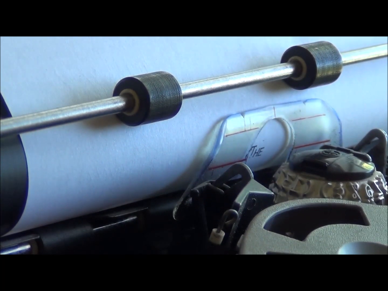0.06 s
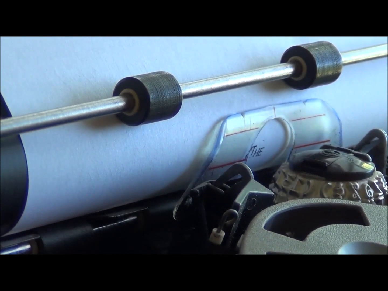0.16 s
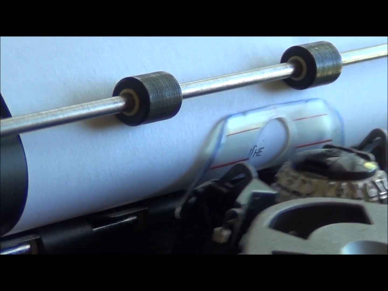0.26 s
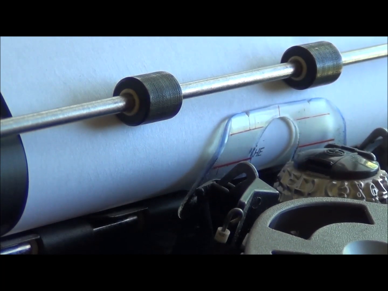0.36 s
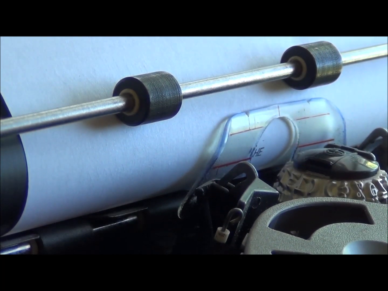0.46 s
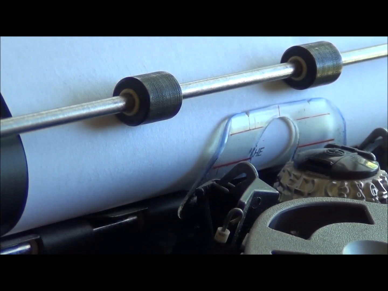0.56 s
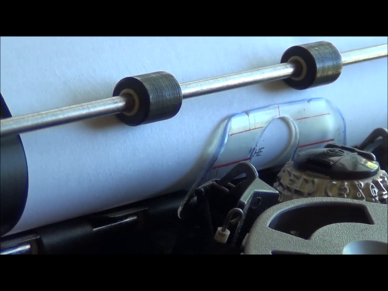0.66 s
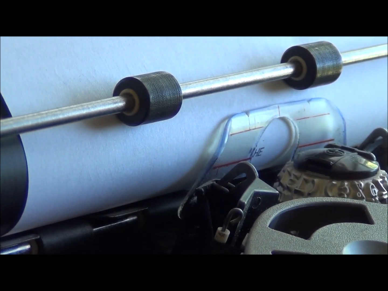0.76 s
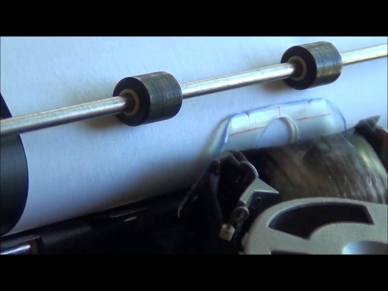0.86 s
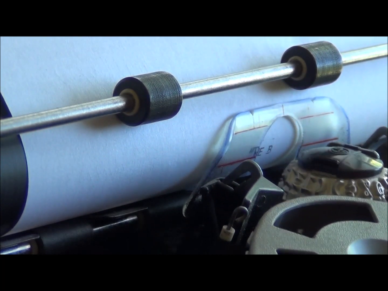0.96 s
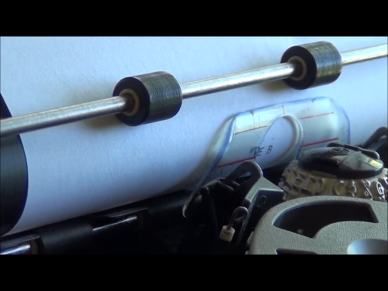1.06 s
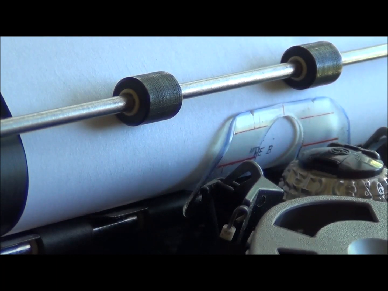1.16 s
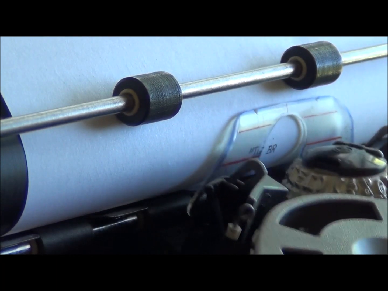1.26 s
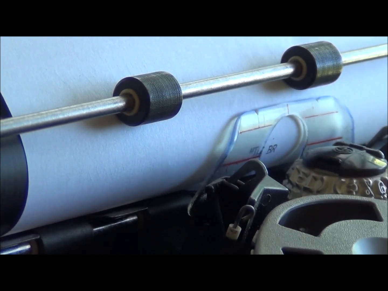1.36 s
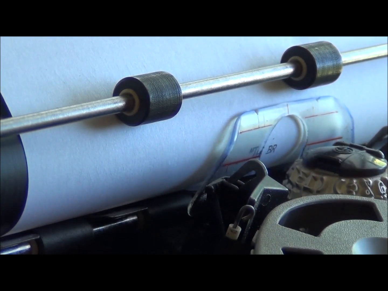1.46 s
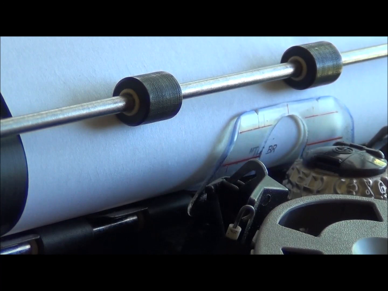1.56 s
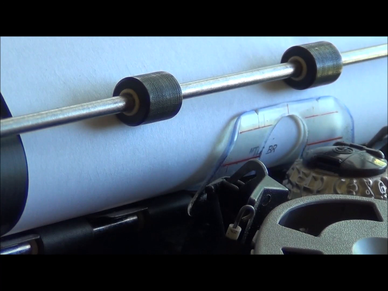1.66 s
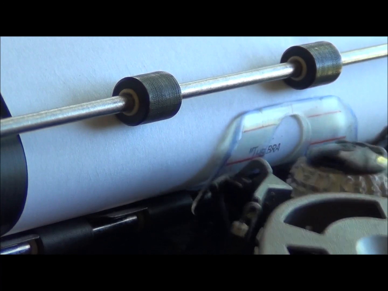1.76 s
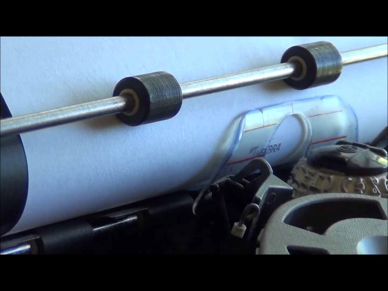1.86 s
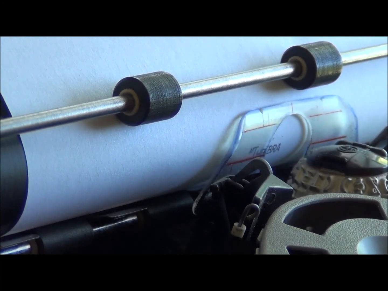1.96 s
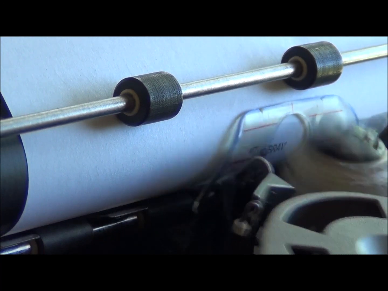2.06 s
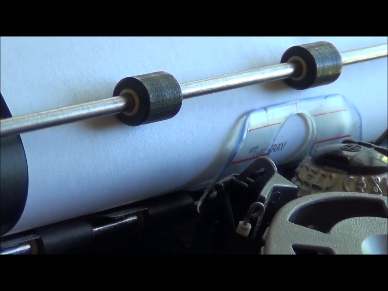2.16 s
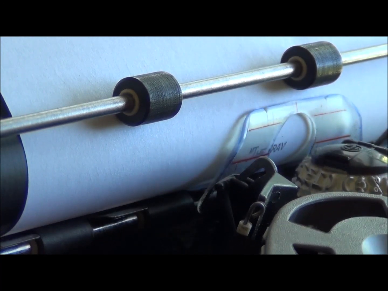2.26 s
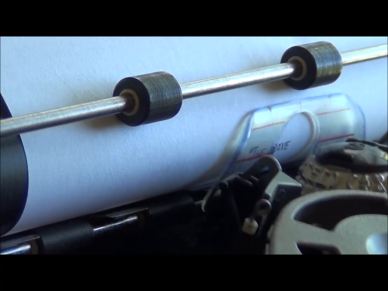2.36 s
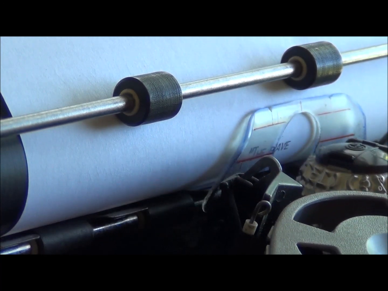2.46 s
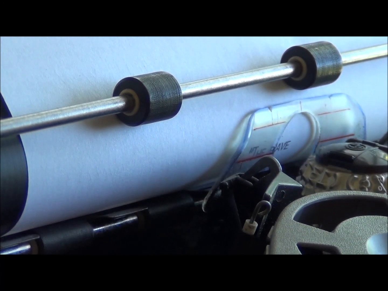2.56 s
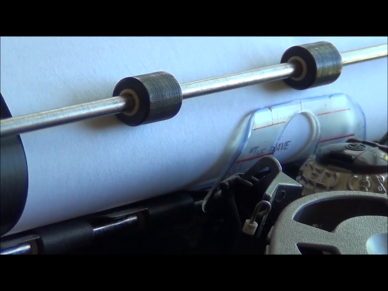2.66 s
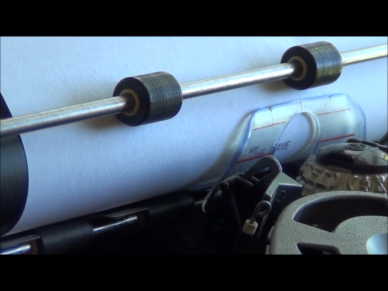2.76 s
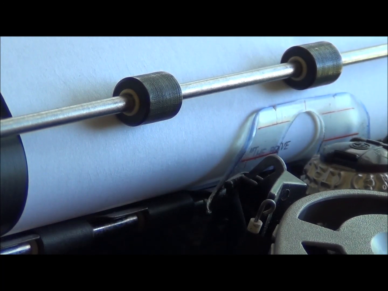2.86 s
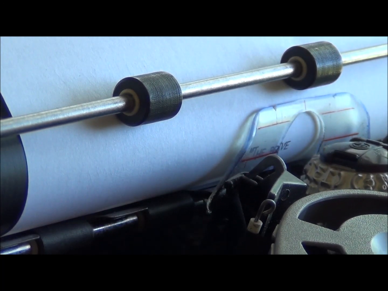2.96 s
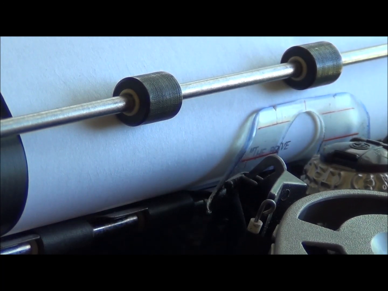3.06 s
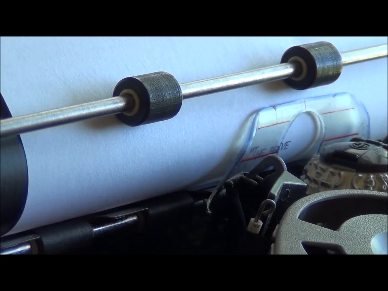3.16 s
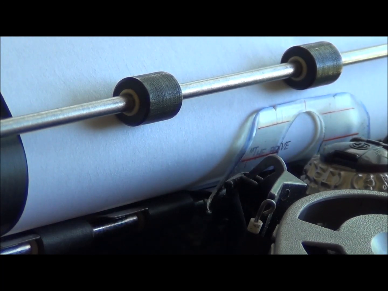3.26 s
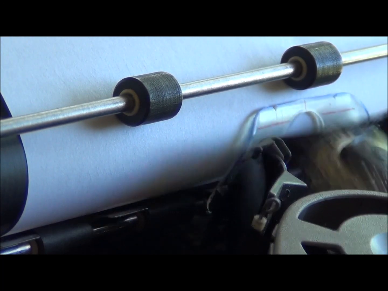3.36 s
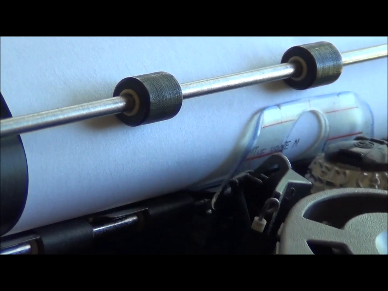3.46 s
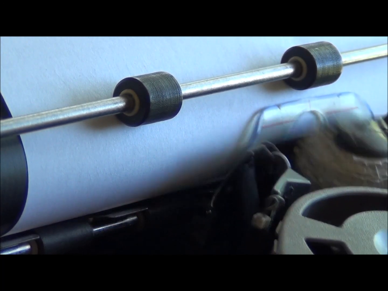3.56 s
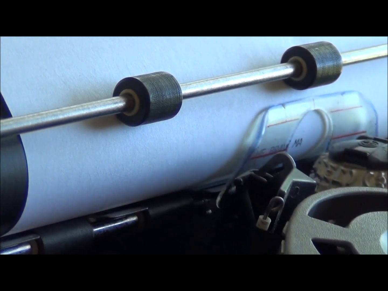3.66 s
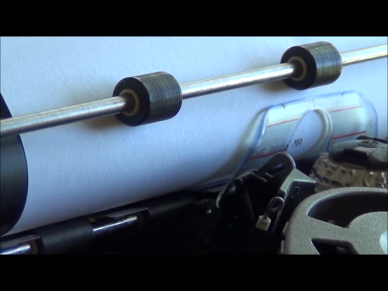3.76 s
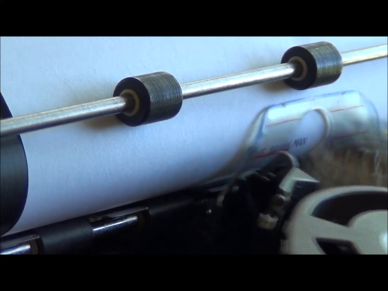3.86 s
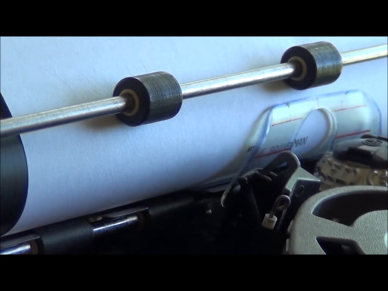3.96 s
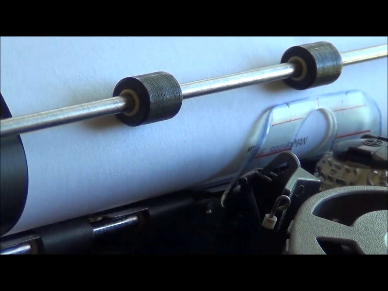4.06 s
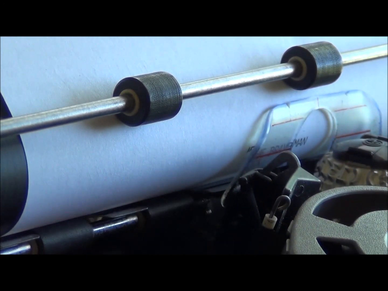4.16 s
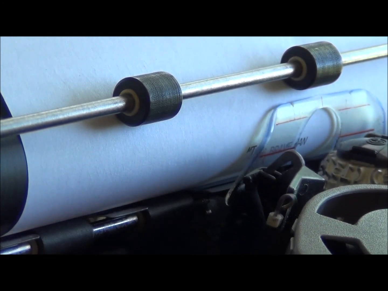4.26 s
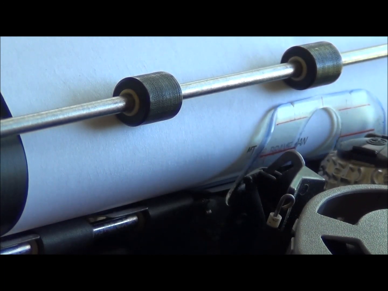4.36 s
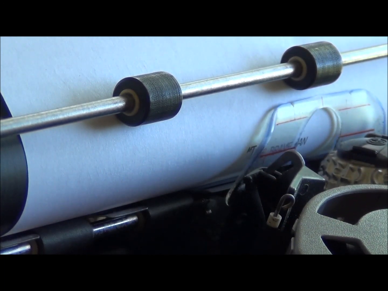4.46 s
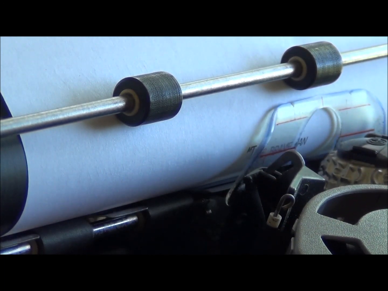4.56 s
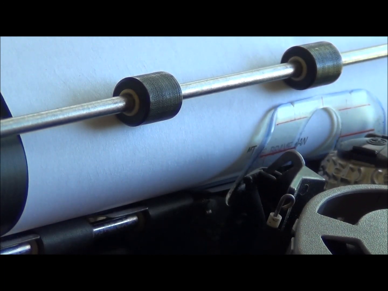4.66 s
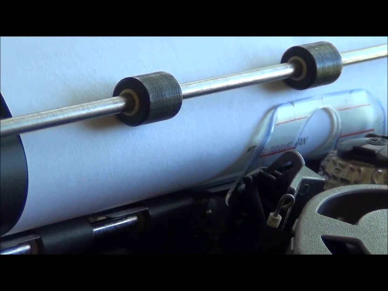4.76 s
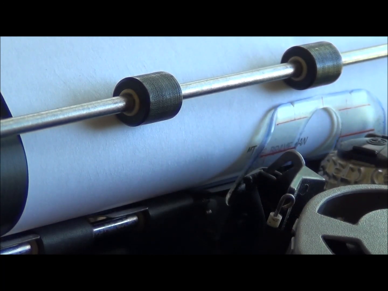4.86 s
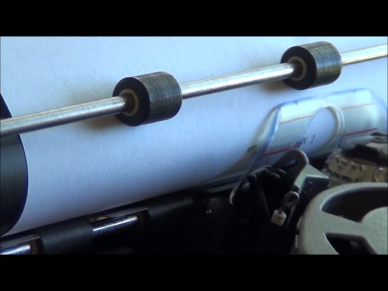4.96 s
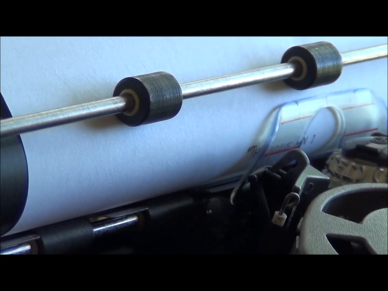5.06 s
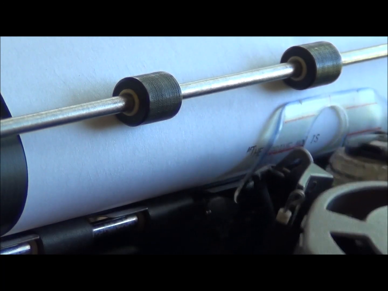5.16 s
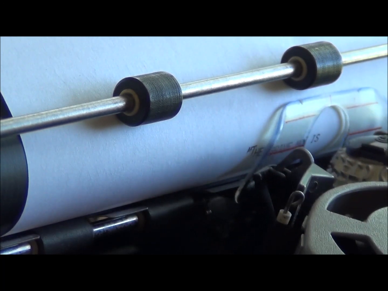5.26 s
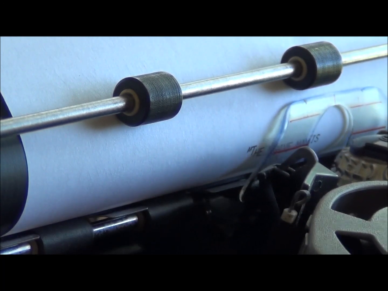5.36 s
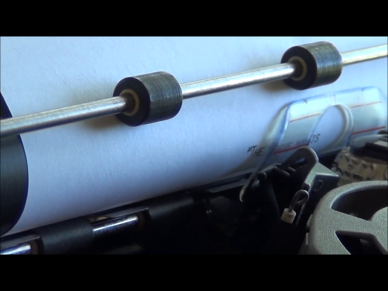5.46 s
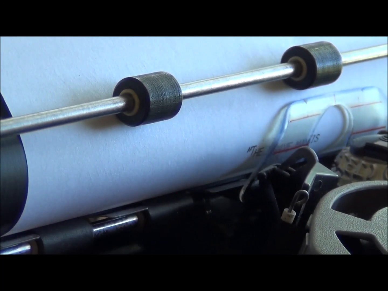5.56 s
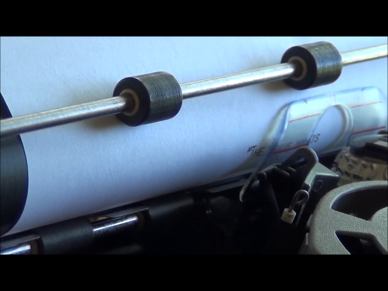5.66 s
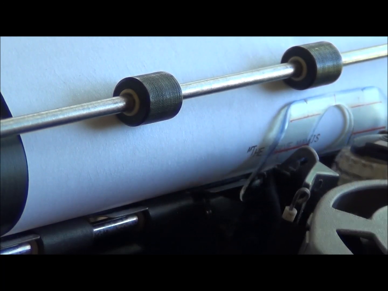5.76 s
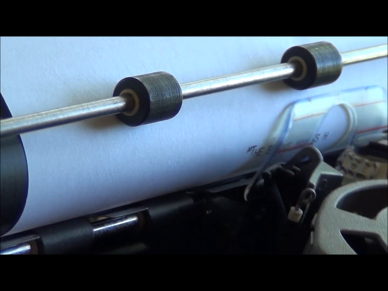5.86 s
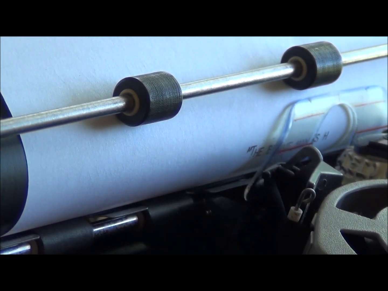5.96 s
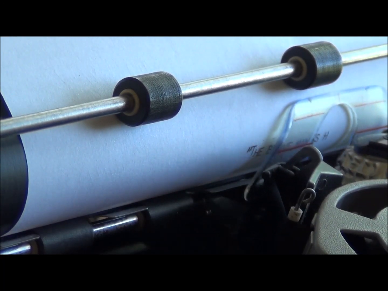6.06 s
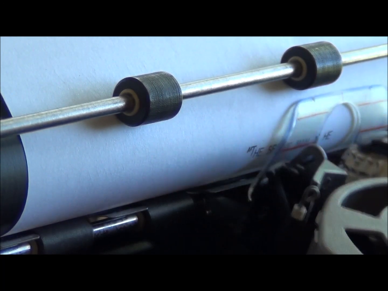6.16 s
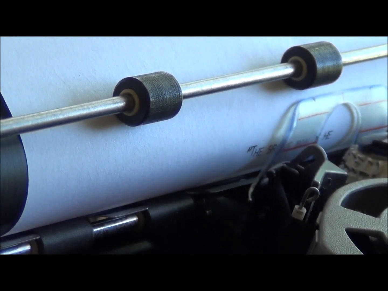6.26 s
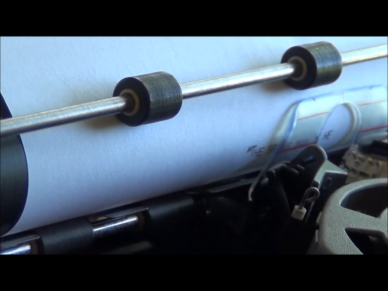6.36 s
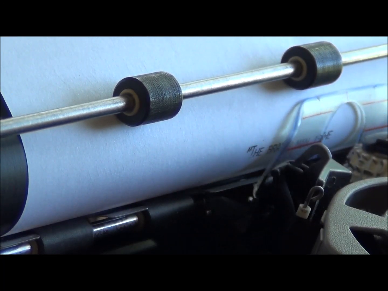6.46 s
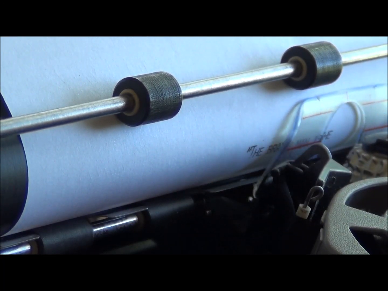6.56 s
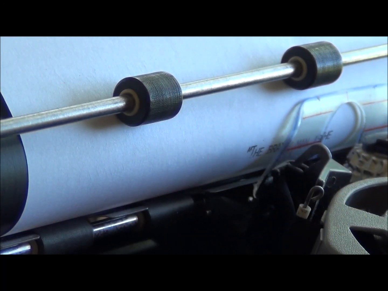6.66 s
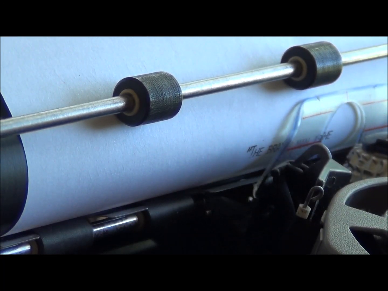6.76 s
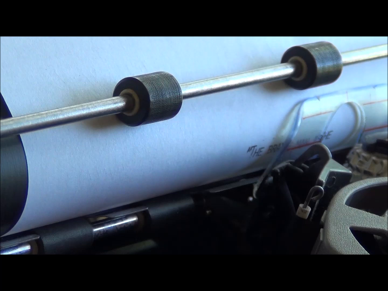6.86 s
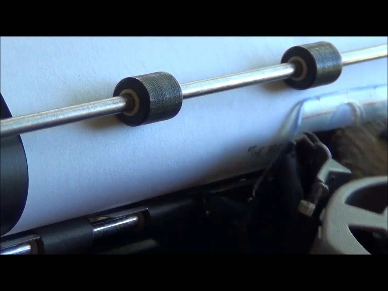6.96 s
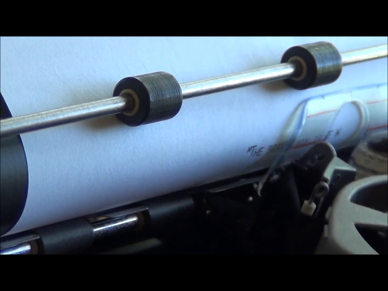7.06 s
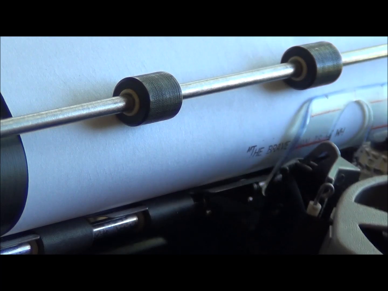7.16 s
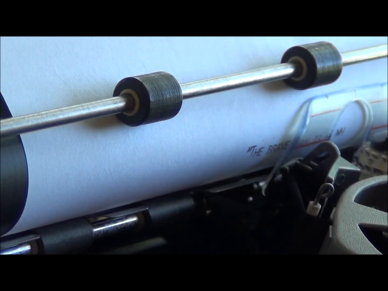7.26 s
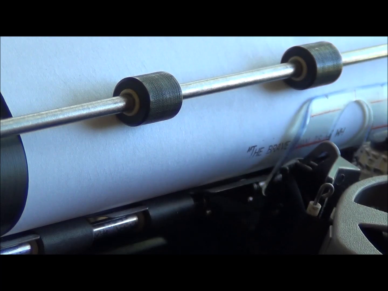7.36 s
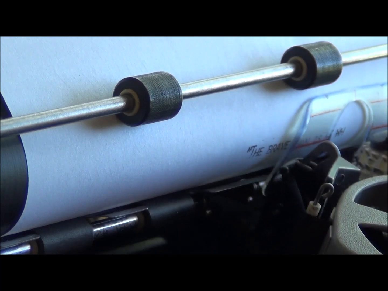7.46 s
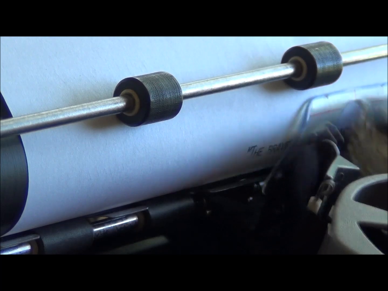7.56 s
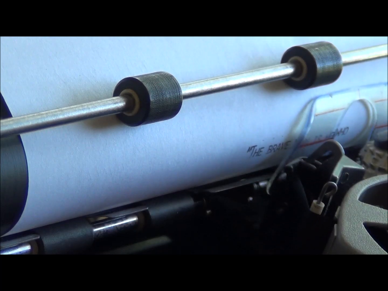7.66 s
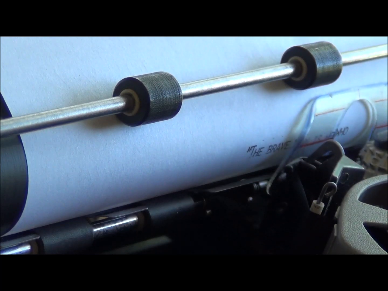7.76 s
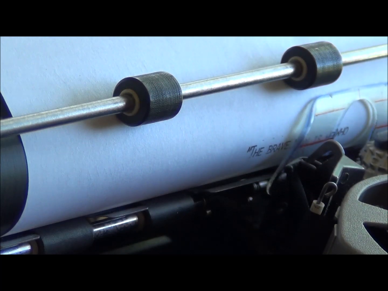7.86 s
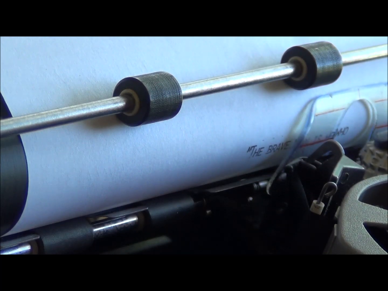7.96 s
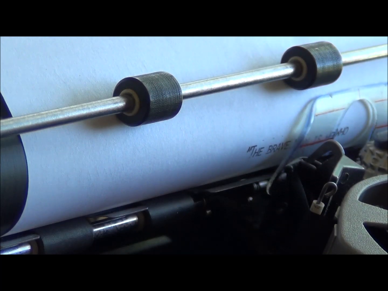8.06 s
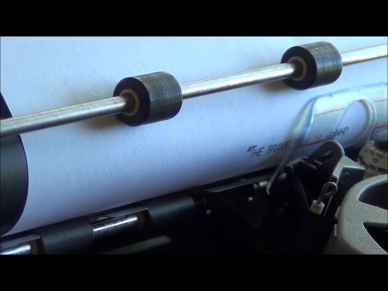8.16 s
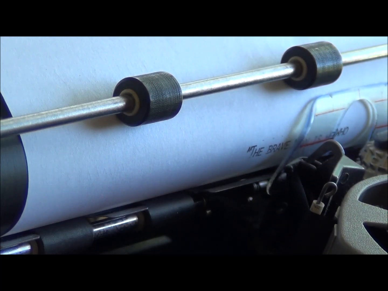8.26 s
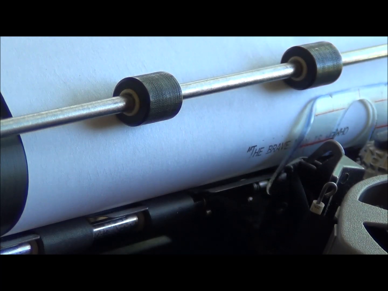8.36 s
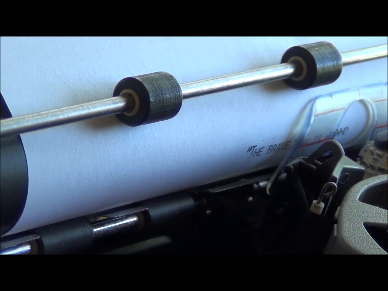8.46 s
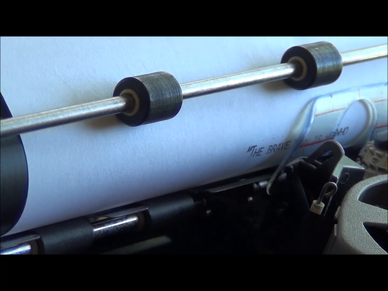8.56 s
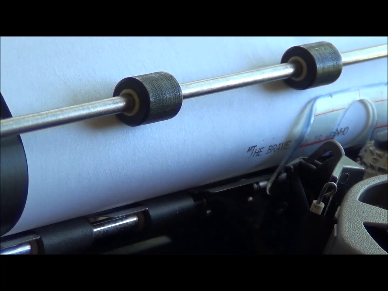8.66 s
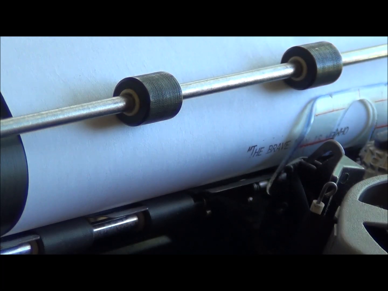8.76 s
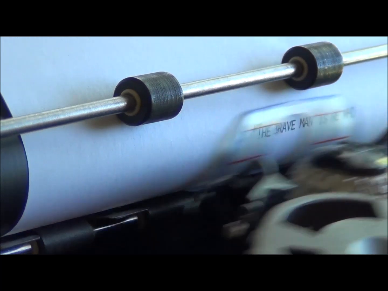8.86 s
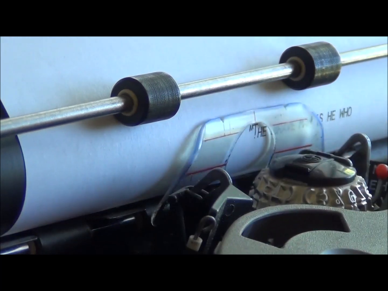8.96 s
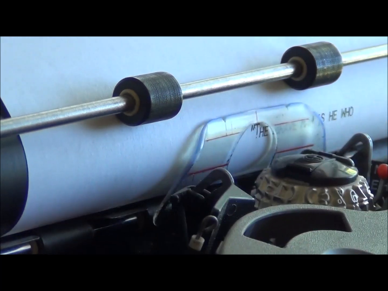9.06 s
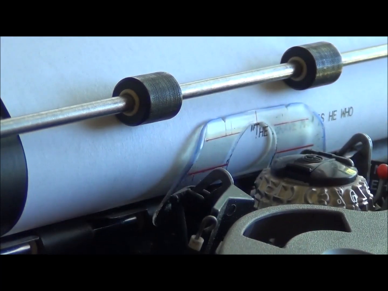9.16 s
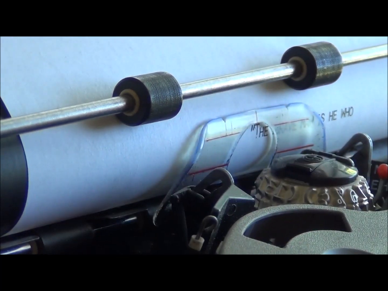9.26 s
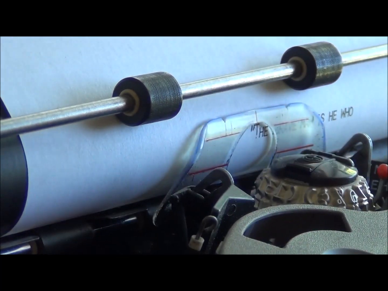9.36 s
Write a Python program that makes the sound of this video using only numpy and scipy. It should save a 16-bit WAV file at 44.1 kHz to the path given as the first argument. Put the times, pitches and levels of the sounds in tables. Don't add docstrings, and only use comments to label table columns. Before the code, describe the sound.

An electric typewriter close by strikes letters in uneven bursts of sharp metallic clacks over a faint motor hum, then its carrier returns with a rattle.

```python
import sys
import numpy as np
from scipy import signal
from scipy.fft import rfft, irfft, next_fast_len
from scipy.io import wavfile
from scipy.ndimage import uniform_filter1d

SR = 44100
rng = np.random.default_rng(int(sys.argv[2]) if len(sys.argv) > 2 else 0)


def log_audio(samples):
    frames = np.atleast_2d(samples).T
    limited = np.clip(frames, -1, 1)
    pcm = np.round(limited * 32767).astype(np.int16)
    wavfile.write(sys.argv[1], SR, pcm)


def attenuation_scalar(level_db):
    decades = np.asarray(level_db, float) / 20
    return 10 ** decades


N = 415422
LEAD = 8820

# time in seconds, level in dB.
MOTOR_LEVEL = [(0.0, -55), (4.99, -54), (9.42, -53)]
# frequency in Hz, level in dB per Hz.
WHIRR_COLOUR = [(15, -29.5), (25, -6), (157, 1), (354, 0.5), (575, -6), (641, -7), (775, -4.5), (840, -7.5),
                (2280, -13.5), (2550, -25), (2840, -19.5), (16000, -36)]
# frequency in Hz, level in dB against the motor, width in Hz.
HUM_LINES = [(58.5, -14, 2), (233, -10, 6), (284, -10, 9), (355, -8, 7), (468, -12, 5), (645, -20, 14),
             (840, -21, 4)]
# frequency in Hz, level in dB, time to fall 60 dB in seconds.
TICK_MODES = [(1600, -10, .03), (2580, 0, .045), (3940, -9, .03)]
TURNS_HZ, TICK_S = 29.98, 8.4855

# frequency in Hz, level in dB per Hz.
METAL_COLOUR = [(250, -30), (600, -9), (1000, -15.5), (1500, -3.5), (2040, -9.5), (2650, -4), (4980, -10.5),
                (9240, -11.5), (13800, -18), (16000, -20.5)]
# frequency in Hz, level in dB, time to fall 60 dB in seconds.
CLUTCH_MODES = [(1160, -9, .05), (1250, 0, .075), (1310, -3, .05), (717, -10, .05)]
FRAME_MODES = [(1450, -4, .045), (1513, 0, .06), (1590, -4, .09), (1680, -4, .05)]
CASE_MODES = [(132, -14.5, 0.15), (227.6, -21.5, 0.52), (275.9, 0, 0.14), (301.8, -4, 0.17),
              (373, -1, 0.15), (390.7, -6.5, 0.13), (479.4, 2.5, 0.051), (670, -24, 0.19)]
BALL_MODES = [(8570, -3, .11), (9394, 0, .15), (10820, -5, .09), (13286, -4, .08)]

# clutch catch in seconds, catch level in dB,
# ball spin level in dB, print level in dB, ball ring level in dB.
LETTERS = [(-.127, 2, -1, 2, -4), (0.8534, 4.5, -7.5, 1.5, -2), (1.185, -1.5, -2, 0, 2.5),
           (1.721, 0, -2.5, 1.5, -0.5), (2.0363, 0, -0.5, -3, 4.5), (2.2876, -5, -7, -1, -2),
           (3.3559, -3, 2, 1, 1.5), (3.5445, -4, -2, 0.5, -3), (3.8336, 1, -7, -2, -1),
           (4.8932, 6, -4, 2, 2), (5.1182, 2.5, 1, 1, -2), (5.7809, 2, 2.5, 1.5, -16),
           (6.1134, 2.5, -3, 1, -2), (6.9514, 3, -0.5, 1.5, -8), (7.0794, 0.5, -2, 0, -6),
           (7.543, 0, -5, 0.5, 0), (9.4045, 5.5, 2.5, 0, -2)]
# start in seconds, level in dB, clutch shock in dB.
LATCHES = [(-.134, -28, -10.5), (0.847, -27, 1), (1.1787, -26, -6), (1.7139, -29, -0.5),
           (2.0302, -26.5, -3), (2.2808, -32, -5.5), (3.3493, -28.5, -4), (3.538, -25.5, -2.5),
           (3.8281, -27, -1), (4.883, -29.5, 2.5), (5.1116, -25.5, -2), (5.7754, -23, 0), (6.1076, -31, -2),
           (6.9417, -26.5, 5), (7.0742, -26.5, -1), (7.5328, -27, 0.5), (9.3958, -26, 0)]
# seconds after the catch, level in dB, brightness in dB.
CATCH_CLICKS = [(0, -17, 0), (.009, -20.5, 0.5)]
SPIN_CLICKS = [(.017, -25, 9.8), (.024, -21.5, 12), (.033, -21, 4)]
PRINT_CLICKS = [(.042, -15.5, 7.5), (.055, -26.5, 5), (.061, -18.5, 2), (.083, -26, 7), (.112, -34.5, -5)]
# seconds after the catch, then levels in dB on clutch shaft, frame and case.
CATCH_BLOWS = [(.001, -23.5, -35.5, -28.5), (.013, -48, -44.5, -28.5)]
SPIN_BLOWS = [(.041, -55, -45, -31)]
PRINT_BLOWS = [(.062, -45, -27, -32), (.082, -49, -43.5, -32.5), (.1, -50.5, -35.5, -32)]
# seconds after the catch, level in dB.
BALL_JOLTS = [(.001, -37.5), (.016, -28.5), (.035, -32)]
# seconds after the catch, frequency in Hz, level in dB,
# time to fall 60 dB in seconds.
DETENT_PINGS = [(-.006, 9180, -29, 0.013), (.057, 8930, -25.5, .02), (.083, 8600, -25, .02)]
# start in seconds, frequency in Hz, level in dB,
# time to fall 60 dB in seconds.
SPRING_PINGS = [(.298, 12800, -42, .16), (8.947, 3400, -24, .04), (5.318, 11570, -26, .12),
                (5.318, 11955, -34, .12), (2.77, 11955, -35, .12), (2.843, 12800, -42, .16),
                (4.288, 11800, -43, .14)]

# start in seconds, level in dB.
KEYS_UP = [(.0185, -41.5), (.371, -47), (0.379, -37), (2.912, -53), (2.919, -38.5), (4.361, -42.5),
           (4.3663, -39.5), (4.573, -64), (5.473, -55.5), (5.4787, -35.5), (6.5197, -43), (6.528, -37)]
# start in seconds, level in dB.
KEYS_DOWN = [(0.191, -49.5), (.8276, -52), (.8381, -55), (1.16, -47.5), (1.1688, -48.5), (1.6969, -45),
             (2.015, -46), (2.0234, -52), (2.2644, -46), (2.7323, -51.5), (3.3324, -45.5), (3.343, -42),
             (3.516, -45), (3.8073, -43), (4.183, -54), (4.196, -60), (4.8688, -46.5), (4.875, -41),
             (5.0955, -45), (5.1035, -41), (5.7514, -56), (5.7565, -46), (6.089, -47), (6.099, -47),
             (6.9292, -41.5), (7.5178, -46), (7.527, -38), (9.3887, -45.5)]

# start in seconds, level in dB.
SPACE_BARS = [(.225, 0.5), (2.7643, -1.5), (4.2155, -2), (5.3161, 0.5), (6.36, 1.5)]
# start in seconds, level in dB.
CARRIER_STEPS = [(0.2812, 2), (2.8211, -1), (4.2683, 0.4), (5.3688, 0.92), (6.4126, -0.55)]
# seconds after the catch or step, level in dB, brightness in dB.
SPACE_CATCH_CLICKS = [(0, -26.5, 8.5), (.006, -30, -4)]
SPACE_STEP_CLICKS = [(-.0095, -27, 16.5), (-.003, -30, 0.5), (.001, -21, 2.5), (.009, -28.5, 0),
                     (.02, -34, 11.5)]
# seconds after the catch or step, levels in dB on clutch shaft, frame and case.
SPACE_CATCH_BLOWS = [(0.0032, -45, -41.5, -35)]
SPACE_STEP_BLOWS = [(.001, -42, -28.5, -30.5)]
# seconds after the catch, level in dB.
SPACE_SLIDE = (0.0018, -28)

# time in seconds, level in dB.
CHIRPS = [(7.875, -68), (7.9, -71), (7.96, -69), (8.0, -66), (8.075, -68)]
# start in seconds, level in dB, brightness in dB.
RETURN_CLICKS = [(8.726, -23.5, 6), (8.7361, -18, 3.5), (8.7521, -20.5, -3), (8.801, -26, 5),
                 (8.8155, -28, -3), (8.8254, -28.5, -8), (8.8334, -28, -13), (8.848, -19.5, 4),
                 (8.8668, -26.5, -19), (8.9388, -14.5, 2), (8.9508, -20, 13), (8.9629, -20.5, -5.5)]
# start in seconds, levels in dB on clutch shaft, frame and case.
RETURN_BLOWS = [(8.725, -53, -48, -33), (8.741, -35, -32, -36), (8.798, -41, -37, -37),
                (8.811, -54, -45, -37.5), (8.855, -58, -34, -26.5), (8.949, -58, -58, -28.5),
                (8.987, -65, -64, -26)]
# moment they are caught in seconds, level in dB.
RETURN_SLIDES = [
    (8.7275, -29.5),
    (8.938, -37),
]
# time in seconds, peak in dB, frequency in Hz, spread in seconds.
MARGIN_STOP = (8.8132, -9, 1200, .0003)

# frequency in Hz, time to fall 60 dB in seconds.
ROOM_DECAY = [(150, 0.74), (500, 0.82), (1400, 0.53), (3700, 0.48), (9000, 0.3), (16000, 0.26)]
# frequency in Hz, side minus middle in dB.
WIDTH = [(60, -50.5), (150, -45), (380, -31.5), (700, -16.5), (1200, -22), (2380, -15), (6500, -9.5),
         (15000, -25)]


def evened(x):
    return x / np.sqrt(np.mean(x ** 2) + 1e-20)


def read(points, hz):
    f, value = np.transpose(points)
    return np.interp(np.log(hz + 1), np.log(f + 1), value)


def add(mix, s, sound):
    part = mix[round(s * SR) + LEAD:][:len(sound)]
    part += sound[:len(part)]


def colour(x, points):
    size = next_fast_len(x.shape[-1])
    gain = attenuation_scalar(read(points, np.fft.rfftfreq(size, 1 / SR)))
    return irfft(rfft(x, size) * gain, size)[..., :x.shape[-1]]


def ring(hz, db, t60, start, seconds):
    t = np.maximum(np.arange(round(seconds * SR)) / SR - start[:, None], 0)
    fade = attenuation_scalar(db[:, None] - 60 * t / t60[:, None])
    tones = fade * np.sin(2 * np.pi * hz[:, None] * t)
    return tones.sum(0) / np.sqrt(np.sum(attenuation_scalar(2 * db)) / 2)


def struck(blows, modes, detune=.01, spread_db=8, contact_s=0.003967):
    out = np.zeros(N + LEAD)
    hz, db, t60 = np.transpose(modes)
    for (s, blow_db), draw in zip(blows, rng.random((len(blows), 3, len(hz)))):
        blow_hz = hz * (1 + detune * (draw[0] - .5))
        tone_db = db + spread_db * (draw[1] - .5)
        sound = ring(blow_hz, tone_db, t60, contact_s * draw[2], 0.25)
        onset = np.minimum(np.arange(len(sound)) / (contact_s * SR), 1)
        add(out, s, attenuation_scalar(blow_db) * sound * onset)
    return out


def motor():
    t = np.arange(N) / SR
    whirr = evened(colour(rng.standard_normal((2, N)), WHIRR_COLOUR))
    mid = attenuation_scalar(-2.5) * whirr[0]
    for hz, db, width_hz in HUM_LINES:
        r = np.exp(-np.pi * width_hz / SR)
        noise = rng.standard_normal((2, N + SR))
        waver = evened(signal.lfilter([1], [1, -2 * r, r * r], noise)[:, SR:])
        steady = (1.1 + waver[0]) * np.cos(2 * np.pi * hz * t)
        mid += attenuation_scalar(db) * (steady + waver[1] * np.sin(2 * np.pi * hz * t))
    times = np.arange(TICK_S % (1 / TURNS_HZ), N / SR, 1 / TURNS_HZ)
    ticks = np.transpose([times, -10 + 1.5 * rng.standard_normal(len(times))])
    mid += struck(ticks, TICK_MODES, detune=.012, spread_db=3, contact_s=.002)[LEAD:]
    level = attenuation_scalar(np.interp(t, *np.transpose(MOTOR_LEVEL)))
    return level * mid, level * attenuation_scalar(-1.5) * colour(whirr[1], WIDTH)


def clicks(rows, t60=.042):
    lumps_db, chatter_db = 1.2, 3
    snap_db, snap_t60, onset_s = -2, .01, .0013
    out, size = np.zeros(N + LEAD), 2048
    t, hz = np.arange(size) / SR, np.fft.rfftfreq(size, 1 / SR)
    tilt = np.tanh(np.log((hz + 1) / 5500) * 2) / 2
    for (s, db, bright_db), draw in zip(rows, rng.standard_normal((len(rows), 3, size))):
        noise, lumps, chatter = draw
        shape_db = read(METAL_COLOUR, hz) + np.clip(bright_db, -14, 14) * tilt
        shape_db += lumps_db * evened(uniform_filter1d(lumps[:len(hz)], size=40))
        metal = evened(irfft(rfft(noise) * attenuation_scalar(shape_db)))
        rattle = attenuation_scalar(-60 * t / t60 + chatter_db * evened(uniform_filter1d(chatter, size=60)))
        snap = attenuation_scalar(snap_db - 60 * t / snap_t60)
        add(out, s, attenuation_scalar(db) * metal * (rattle + snap) * np.minimum(t / onset_s, 1))
    return out


def played(steps, s, db):
    rows = np.array(steps, float)[None].repeat(len(s), axis=0)
    levels = slice(1, 2) if rows.shape[2] < 4 else slice(1, 4)
    rows[:, :, 0] += s[:, None]
    rows[:, :, levels] += db[:, None, None]
    return rows.reshape(-1, rows.shape[2])


def scattered(taps):
    return taps + rng.standard_normal(taps.shape) * [.0005, 1.24, 5.5]


def letters():
    s, catch_db, spin_db, print_db, ring_db = np.transpose(LETTERS)
    latch_s, latch_db, shock_db = np.transpose(LATCHES)
    taps = scattered(np.vstack([played(CATCH_CLICKS, s, catch_db), played(SPIN_CLICKS, s, spin_db),
                                played(PRINT_CLICKS, s, print_db)]))
    latch_taps = played([(0, 0.0012, 9)], latch_s, latch_db)
    blows = np.vstack([played(CATCH_BLOWS, s, shock_db), played(SPIN_BLOWS, s, spin_db),
                       played(PRINT_BLOWS, s, print_db)])
    return np.vstack([taps, latch_taps]), blows, played(BALL_JOLTS, s, ring_db)


def pings():
    out, t = np.zeros(N + LEAD), np.arange(SR // 2) / SR
    rows = list(SPRING_PINGS)
    for catch_s, _, _, print_db, _ in LETTERS:
        rows += [(catch_s + after, hz, db + print_db, t60) for after, hz, db, t60 in DETENT_PINGS]
    for s, hz, db, t60 in rows:
        add(out, s, attenuation_scalar(db - 60 * t / t60) * np.sin(2 * np.pi * hz * t) * np.minimum(t / 0.0029, 1))
    return out


def keys():
    s, db = np.transpose(list(KEYS_DOWN) + list(KEYS_UP))
    return clicks(played([(0, 0.0026, 7)], s, db), t60=0.035)


def space_bar():
    (bar_s, bar_db), (step_s, step_db) = np.transpose(SPACE_BARS), np.transpose(CARRIER_STEPS)
    taps = scattered(np.vstack([played(SPACE_CATCH_CLICKS, bar_s, bar_db),
                                played(SPACE_STEP_CLICKS, step_s, step_db)]))
    blows = np.vstack([played(SPACE_CATCH_BLOWS, bar_s, bar_db),
                       played(SPACE_STEP_BLOWS, step_s, step_db)])
    return taps, blows, played([SPACE_SLIDE], bar_s, bar_db)


def slides(catches):
    run_up_s, rise_db = .008, 15
    out, size = np.zeros(N + LEAD), round(run_up_s * SR)
    for (s, db), noise in zip(catches, rng.standard_normal((len(catches), 1024))):
        scrape = evened(colour(noise, METAL_COLOUR))[:size]
        add(out, s - run_up_s, attenuation_scalar(db + np.linspace(-rise_db, 0, size)) * scrape)
    return out


def squeak():
    squeak_hz, fade_db_per_s = 2527, 500
    t = np.arange(N) / SR
    flutter_db = 2 * evened(uniform_filter1d(rng.standard_normal(N), size=700))
    overtones = ((1, 2), (2, -3), (3, -11))
    tone = sum(attenuation_scalar(db) * np.sin(2 * np.pi * k * squeak_hz * t) for k, db in overtones)
    level = sum(attenuation_scalar(db - fade_db_per_s * abs(t - s)) for s, db in CHIRPS)
    return level * attenuation_scalar(flutter_db) * tone


def margin_stop():
    out = np.zeros(N + LEAD)
    s, db, hz, spread_s = MARGIN_STOP
    t = np.arange(-100, 100) / SR
    add(out, s + t[0], attenuation_scalar(db) * np.cos(2 * np.pi * hz * t) * np.exp(-.5 * (t / spread_s) ** 2))
    return out


def machine():
    letter_taps, letter_blows, jolts = letters()
    space_taps, space_blows, space_catches = space_bar()
    taps = np.vstack([letter_taps, space_taps, RETURN_CLICKS])
    blows = np.vstack([letter_blows, space_blows, RETURN_BLOWS])
    out = attenuation_scalar(2) * clicks(taps) + attenuation_scalar(4) * keys() + pings()
    out += slides(np.vstack([space_catches, RETURN_SLIDES])) + margin_stop()
    out += attenuation_scalar(3.5) * struck(blows[:, [0, 1]], CLUTCH_MODES, detune=0.024, spread_db=-4)
    out += attenuation_scalar(5) * struck(blows[:, [0, 2]], FRAME_MODES, detune=0.015, spread_db=5)
    out += struck(blows[:, [0, 3]], CASE_MODES, detune=0.042, contact_s=0.00826)
    out += attenuation_scalar(4) * struck(jolts, BALL_MODES, detune=.0012, contact_s=.006)
    return signal.sosfilt(signal.butter(3, 140, "high", fs=SR, output="sos"), out)


def tail(speed, rise_s):
    hz, t, z = signal.stft(rng.standard_normal(SR * 3 // 4), SR, nperseg=256)
    fade = attenuation_scalar(-60 * t * speed / read(ROOM_DECAY, hz)[:, None])
    out = signal.istft(z * fade, SR, nperseg=256)[1]
    out = out * np.minimum(np.arange(len(out)) / (rise_s * SR), 1)
    return out / np.linalg.norm(out)


def room(x):
    shift_hz = 9.1
    mid, side = x.copy(), np.zeros(len(x))
    for k in range(3):
        turn = np.cos(np.pi * (shift_hz * np.arange(len(x)) / SR + k / 3))
        share = np.sqrt(2 / 3) * x * turn
        mid_echo = attenuation_scalar(-6.5) * tail(2.5, 0.0034) + attenuation_scalar(-15.5) * tail(0.78, 0.0094)
        side_echo = attenuation_scalar(-9.5) * tail(4, .001) + attenuation_scalar(-14) * tail(0.85, 0.023)
        mid += signal.fftconvolve(share, mid_echo)[:len(x)]
        side += signal.fftconvolve(share, side_echo)[:len(x)]
    return mid, colour(side, WIDTH)


def scene():
    motor_mid, motor_side = motor()
    machine_mid, machine_side = room(machine())
    mid = machine_mid[LEAD:] + motor_mid + squeak()
    side = machine_side[LEAD:] + motor_side
    return np.array([mid + side, mid - side])


def low_pass(x):
    return signal.sosfilt(signal.butter(12, 16620, fs=SR, output="sos"), x)


def record(dry):
    threshold_db, recovery_db_per_s, ceiling = -23, 740, .34
    power_db = 10 * np.log10(abs(uniform_filter1d((dry ** 2).mean(0), size=130)) + 1e-12)
    fall = np.arange(N) * recovery_db_per_s / SR
    held_db = np.maximum.accumulate(power_db + fall) - fall
    over_db = np.maximum(held_db - threshold_db, 0)
    limited = dry / attenuation_scalar(.5 * uniform_filter1d(over_db, size=90))
    limited = ceiling * np.tanh(limited / ceiling)
    edge = signal.firwin(401, 15800, window=("kaiser", 6), fs=SR)
    return low_pass(signal.oaconvolve(limited, edge[None], "same"))


dry = scene()
out = record(dry)
log_audio(out)
```